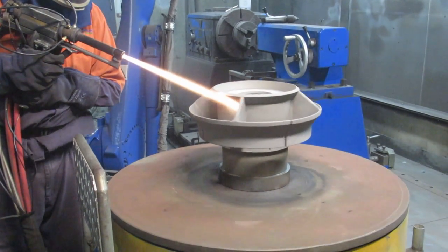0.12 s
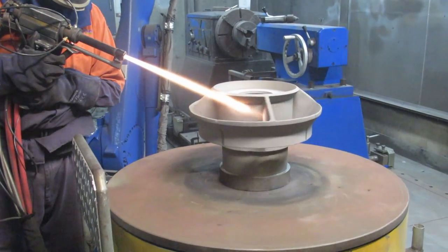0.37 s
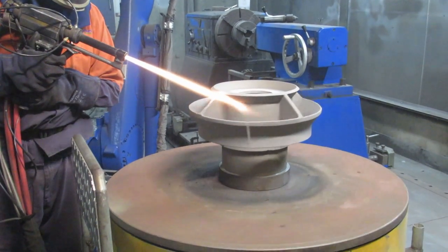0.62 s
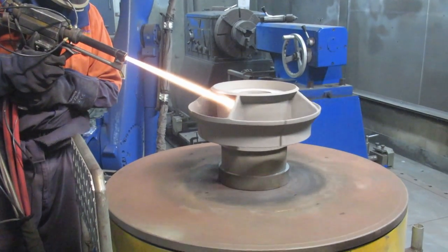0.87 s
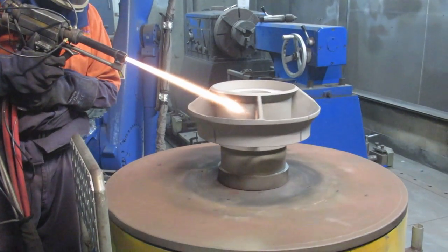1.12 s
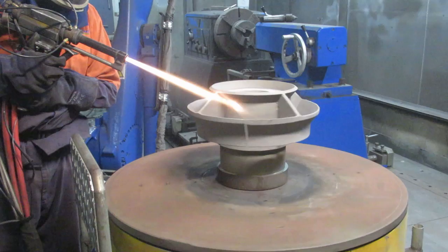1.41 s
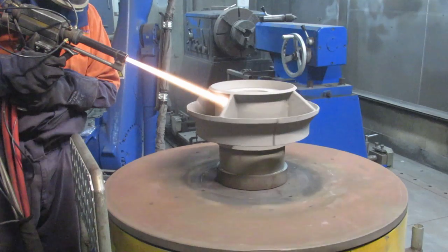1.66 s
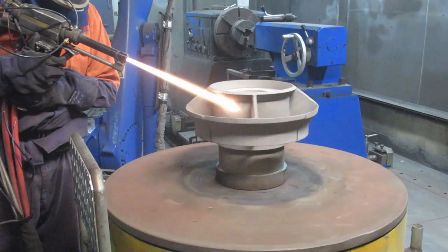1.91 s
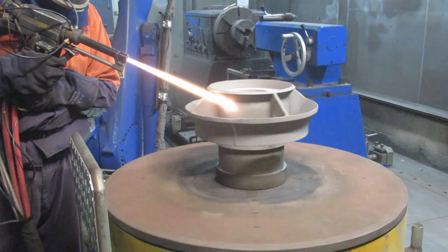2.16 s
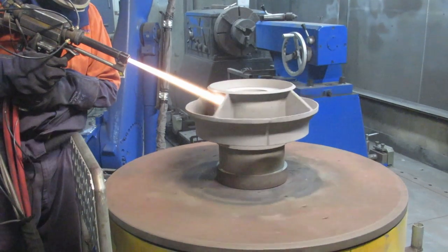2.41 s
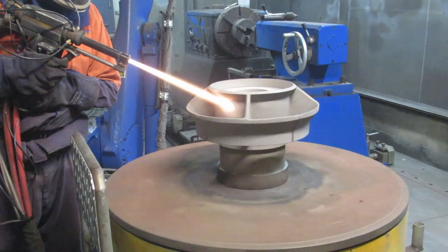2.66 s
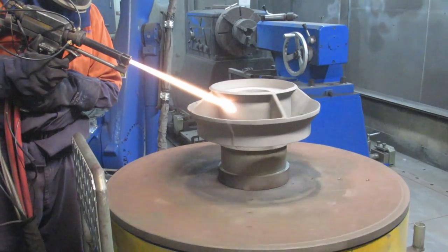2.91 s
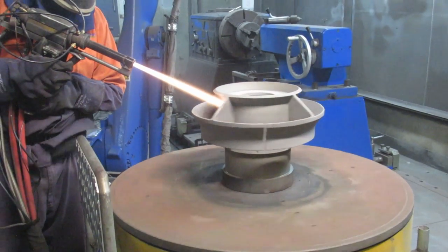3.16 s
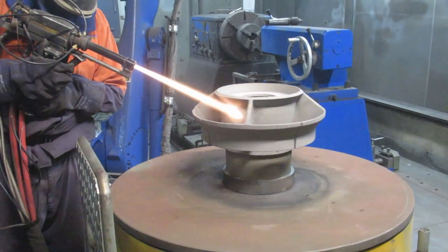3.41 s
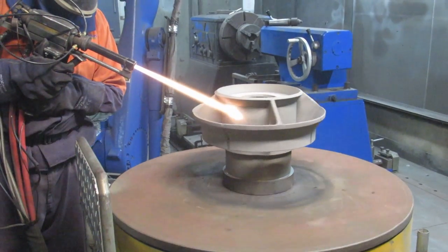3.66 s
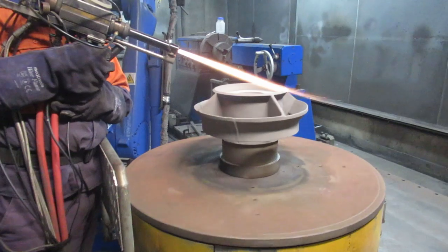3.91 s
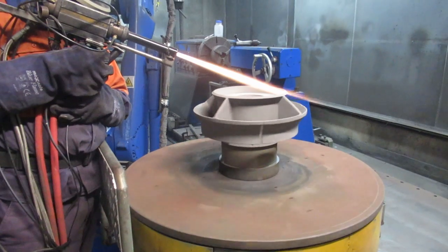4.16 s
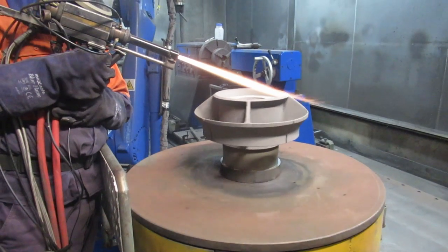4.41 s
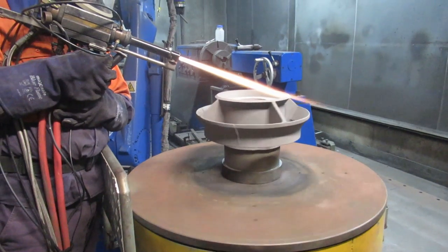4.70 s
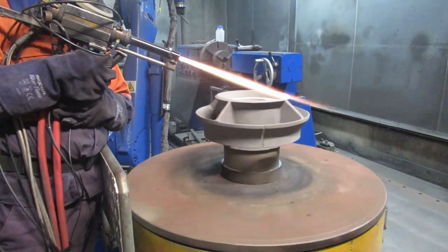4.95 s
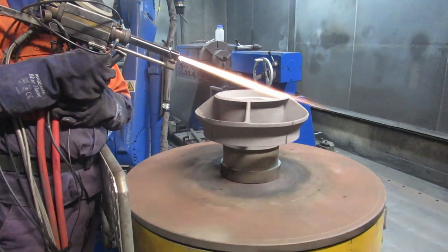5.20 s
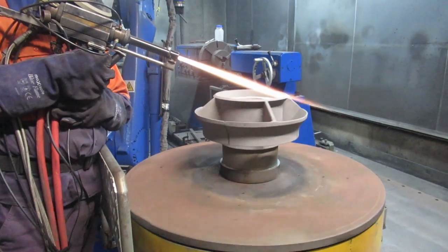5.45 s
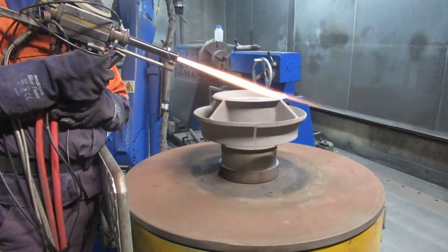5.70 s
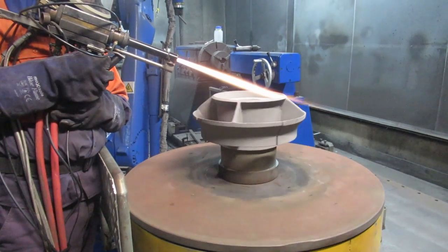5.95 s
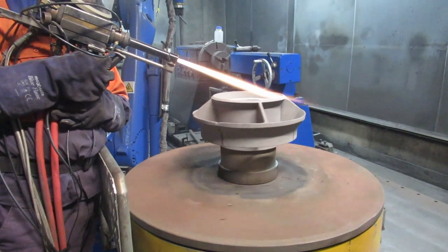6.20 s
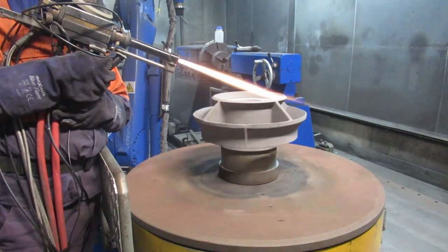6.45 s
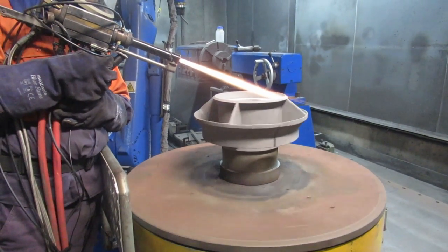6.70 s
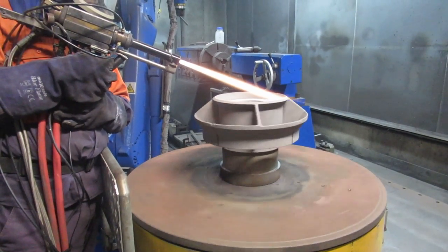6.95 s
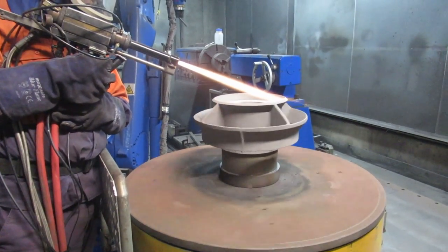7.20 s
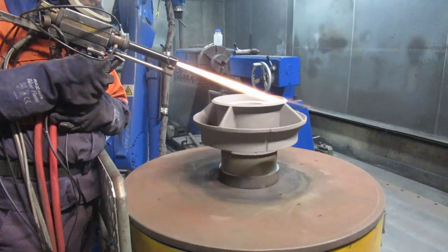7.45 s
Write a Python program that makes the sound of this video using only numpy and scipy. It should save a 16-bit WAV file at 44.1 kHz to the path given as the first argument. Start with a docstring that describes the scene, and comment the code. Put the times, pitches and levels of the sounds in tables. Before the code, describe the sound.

From 0 s a thermal spray gun is already at full blast, its fast flame jet striking a turning metal part in a steel booth. The sound is a dense, harsh wall of noise: a coarse turbulent roar strongest in the middle range, with bright, forceful hiss above and little deep bass. The close microphone is slightly overloaded, flattening the peaks. Level and roar flutter faintly and irregularly. Every so often, especially in the first 2.5 s, the noise thins for a twentieth of a second into a watery cluster of tones. At about 3.87 s everything cuts to total silence, returning abruptly at about 4.08 s, a hair louder. The same roar and hiss then continue until the end at roughly 7.5 s, with more frequent brief patches of treble spreading between the ears and scattered tonal glitches. Otherwise it stays centred and unbroken, with no build-up or fade.

```python
"""Dense roar and hiss from the first instant: a thermal spray gun's fast flame jet on a turning metal
part in a steel booth. Coloured noise stands for the turbulence; a cubic steepens its peaks and tanh
overloads the microphone. Roar and whole level flutter at random. A short silence cuts the sound in
two; now and then the noise thins to a few sines or treble bands widen between the ears."""
import sys
import numpy as np
from scipy import signal
from scipy.fft import rfft, irfft
from scipy.io import wavfile

SR = 44100
rng = np.random.default_rng(int(sys.argv[2]) if len(sys.argv) > 2 else 0)


def undo_db(level):
    """Turn decibels back into plain size, where 20 dB means ten times bigger."""
    steps = np.asarray(level, float) / 20
    return 10 ** steps


def generate_wav(sig):
    """Save sig (samples, or channels by samples) to the path in sys.argv[1] as 16-bit PCM at SR."""
    pcm = np.round(np.clip(np.atleast_2d(sig).T, -1, 1) * 32767).astype(np.int16)
    wavfile.write(sys.argv[1], SR, pcm)


N = 335160

# turbulence spectrum ahead of steepening and hiss gain: f/Hz, relative density/dB
COLOUR_HZ_DB = [(15, -47.5), (25, -23.5), (160, -5.5), (300, -2.5), (750, 0), (1900, -1.5), (2700, -4),
                (3600, -7.5), (4500, -8.5), (6500, -7), (10000, -7.5), (13900, -10.5), (14250, -12),
                (15000, -13.5)]
# moments thinned to tones: centre t/s, extra hold/s
THIN_MOMENTS_S = [(0.089, 0.0), (0.28, 0.0), (0.43, 0.0), (0.517, 0.0), (1.197, 0.0), (1.348, 0.0),
                  (1.582, 0.0), (1.646, 0.0), (1.817, 0.0), (1.945, 0.0), (2.222, 0.0), (2.307, 0.0),
                  (2.798, 0.0), (3.225, 0.0), (4.206, 0.0), (4.461, 0.0), (4.719, 0.0), (5.338, 0.0),
                  (5.476, 0.021), (5.529, 0.0), (5.978, 0.0), (6.425, 0.0), (6.552, 0.0), (7.3, 0.0),
                  (7.364, 0.0)]

SILENCE_S, FADE_S = (3.8665, 4.079), 0.0017   # (start, end)
JET_GAIN_DB = (-17.0, -16.5)   # before, after the silence
ROAR_TO_HISS_HZ, TOP_HZ = 2500, 14990
HISS_GAIN_DB = 4   # nozzle hiss against the roar on the part
ROAR_DRIFT_DB, ROAR_DRIFT_HZ = 0.52, 5.2
JET_DRIFT_DB, JET_DRIFT_HZ = 0.48, 9.1
STEEPENING, LOPSIDED, OVERLOAD = 0.12, 0.04, 3.4   # for a signal of rms 1
THIN_S, TONE_COUNT, TONES_DB = 0.05, 28, -1.5
WIDE_S, WIDE_DB = 0.04, 0
WIDE_PER_S = (2.1, 8.8)   # before, after the silence
WIDE_FROM_HZ, WIDE_SPAN_HZ = (4200, 14500), (900, 2000)   # ranges of lower edge, bandwidth


def jet():
    """Turbulence: shaped, steepened noise, split into a swelling roar and a steady-gain hiss."""
    hz = np.fft.rfftfreq(N, 1 / SR)
    white = rng.standard_normal(N)
    turbulence = irfft(rfft(white) * undo_db(at_hz(COLOUR_HZ_DB, hz)), N)
    loud = steepened(rms_one(turbulence))
    spectrum = rfft(thinned(loud)) * (hz < TOP_HZ)
    roar_share = 1 / (1 + (hz / ROAR_TO_HISS_HZ) ** 4)
    roar_swell = undo_db(ROAR_DRIFT_DB * drift(ROAR_DRIFT_HZ))
    roar = roar_swell * irfft(spectrum * roar_share, N)
    hiss = undo_db(HISS_GAIN_DB) * irfft(spectrum * (1 - roar_share), N)
    gain_db = np.where(np.arange(N) / SR < SILENCE_S[0], *JET_GAIN_DB)
    return undo_db(gain_db + JET_DRIFT_DB * drift(JET_DRIFT_HZ)) * (roar + hiss)


def steepened(x):
    """Strong swings grow more than weak, falls more than rises; the microphone flattens the strongest."""
    grown = x + STEEPENING * x ** 3 - LOPSIDED * (x ** 2 - 1)
    return rms_one(np.tanh(grown / OVERLOAD))


def thinned(x):
    """Noise briefly crossfades to a few random sines weighted by the turbulence spectrum."""
    kept, tones = np.ones(N), np.zeros(N)
    draws = rng.random((len(THIN_MOMENTS_S), 2, TONE_COUNT, 1))
    for (centre_s, held_s), (pitch, phase) in zip(THIN_MOMENTS_S, draws):
        span, t = around(centre_s, THIN_S + held_s)
        ramp = np.clip(np.minimum(t, t[-1] - t) * 2 / THIN_S, 0, 1)
        swell = np.sin(np.pi / 2 * ramp) ** 2
        hz = pitch ** 1.3 * TOP_HZ   # denser toward the low end
        sines = undo_db(at_hz(COLOUR_HZ_DB, hz)) * np.sin(2 * np.pi * (hz * t + phase))
        kept[span] = 1 - swell
        tones[span] = undo_db(TONES_DB) * swell * rms_one(sines.sum(axis=0))
    return x * np.sqrt(kept) + tones


def widened(x):
    """Adds phase-scrambled copies of treble bands, opposite in the two ears, in brief random patches."""
    side = np.zeros(N)
    stretches_s = [(0, SILENCE_S[0]), (SILENCE_S[1], N / SR)]
    for (start_s, end_s), per_s in zip(stretches_s, WIDE_PER_S):
        count = round(per_s * (end_s - start_s))
        usable_s = end_s - start_s - 2 * WIDE_S
        for k, (when, where, broad) in enumerate(rng.random((count, 3))):
            centre_s = start_s + WIDE_S + (k + when) / count * usable_s   # one per equal slot
            span, t = around(centre_s, WIDE_S)
            low_hz = np.interp(where ** 1.2, [0, 1], WIDE_FROM_HZ)
            high_hz = low_hz + np.interp(broad ** 2, [0, 1], WIDE_SPAN_HZ)
            hz = np.fft.rfftfreq(len(t), 1 / SR)
            band = np.abs(rfft(x[span])) * (hz > low_hz) * (hz < high_hz)
            random_phase = np.exp(2j * np.pi * rng.random(len(hz)))
            scrambled = irfft(band * random_phase, len(t))
            side[span] += undo_db(WIDE_DB) * np.sin(np.pi * t / WIDE_S) ** 2 * scrambled
    return x + side * [[1], [-1]]


def drift(corner_hz):
    """Slow random curve of rms 1: noise at SR / 40 through two equal one-pole low-passes."""
    pole = np.exp(-2 * np.pi * corner_hz * 40 / SR)
    noise = rng.standard_normal(N // 40 + 2002)
    slow = signal.lfilter([1], [1, -2 * pole, pole * pole], noise)[2000:]   # drop the filter's start
    return np.interp(np.arange(N) / 40, np.arange(len(slow)), rms_one(slow))


def rms_one(x):
    """Scales to rms 1."""
    return x / np.sqrt(np.mean(x ** 2) + 1e-20)


def at_hz(points, hz):
    """Interpolates a spectrum in dB on a log-frequency axis."""
    points_hz, points_db = np.array(points).T
    return np.interp(np.log(hz + 1), np.log(points_hz), points_db)


def around(centre_s, length_s):
    """Slice centred on a moment, and its sample times in s from the slice's start."""
    size = round(length_s * SR)
    start = round(centre_s * SR) - size // 2
    return slice(start, start + size), (np.arange(size) + 0.5) / SR


def scene():
    """The jet, straight ahead: equal in both channels."""
    return np.tile(jet(), (2, 1))


def roll_off(x):
    """The treble ends steeply here."""
    return signal.sosfilt(signal.butter(12, 16350, fs=SR, output="sos"), x)


def record(dry):
    """One microphone; a silent gap with short fades, then the wide treble patches."""
    t = np.arange(N) / SR
    outside_s = np.maximum(SILENCE_S[0] - t, t - SILENCE_S[1])
    gate = np.clip(outside_s / FADE_S, 0, 1)
    mix = widened(dry[0] * gate)
    return roll_off(mix)


dry = scene()
out = record(dry)
generate_wav(out)
```